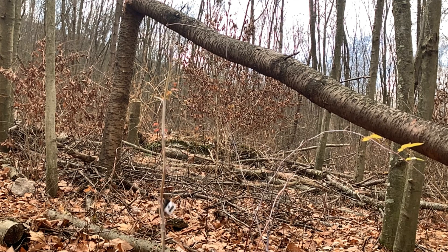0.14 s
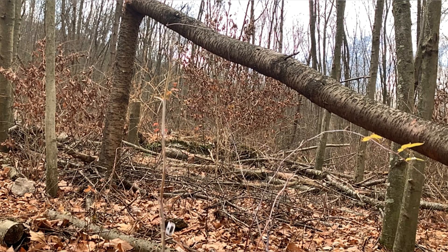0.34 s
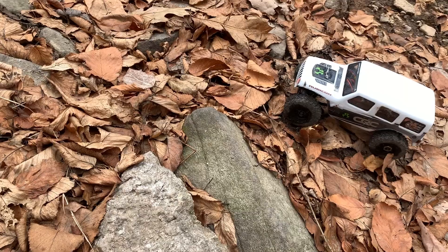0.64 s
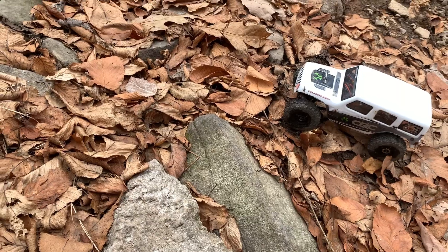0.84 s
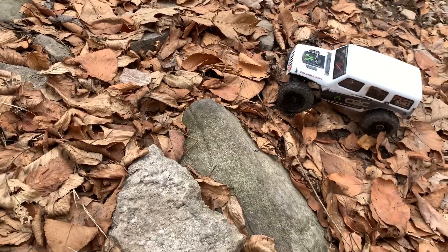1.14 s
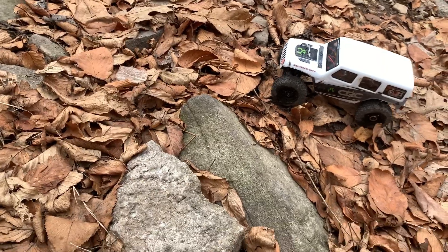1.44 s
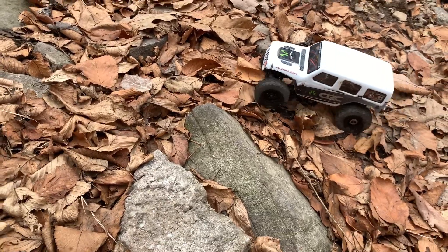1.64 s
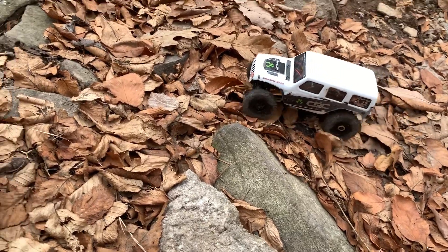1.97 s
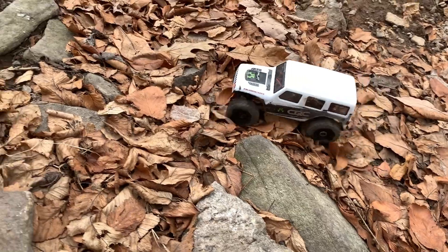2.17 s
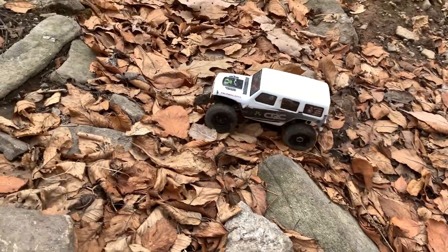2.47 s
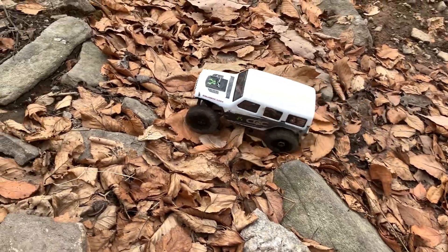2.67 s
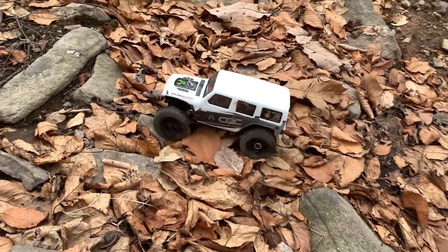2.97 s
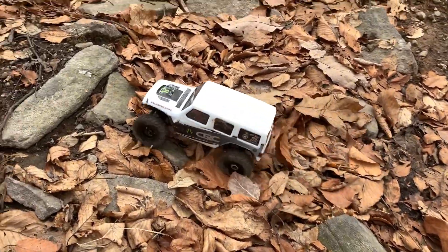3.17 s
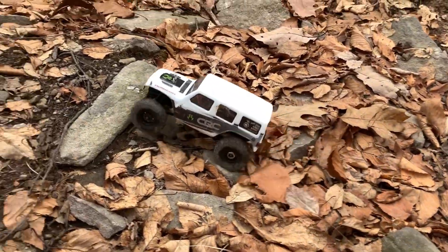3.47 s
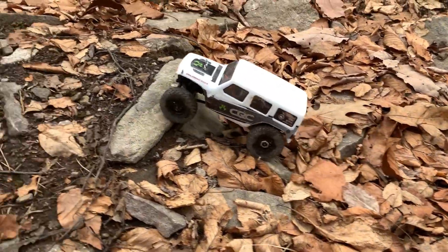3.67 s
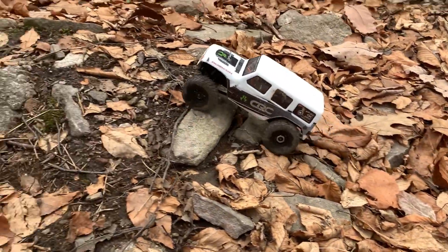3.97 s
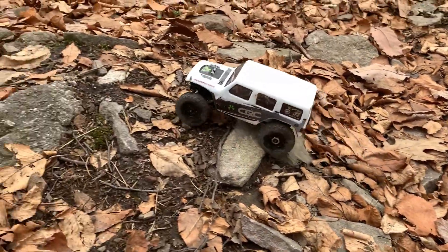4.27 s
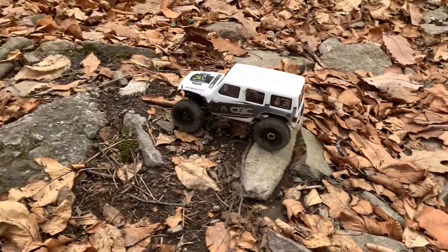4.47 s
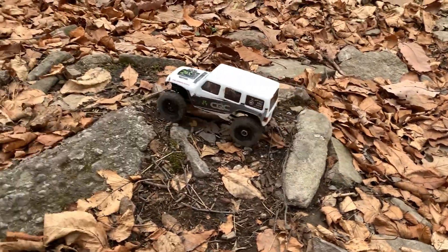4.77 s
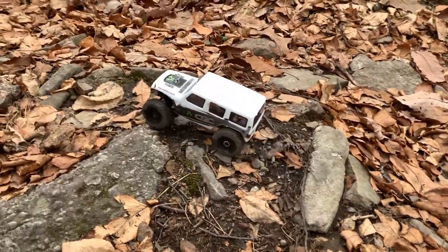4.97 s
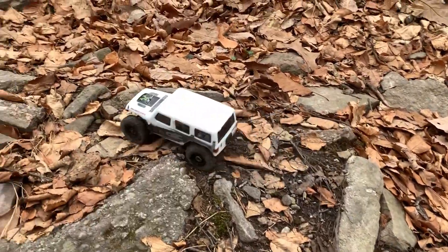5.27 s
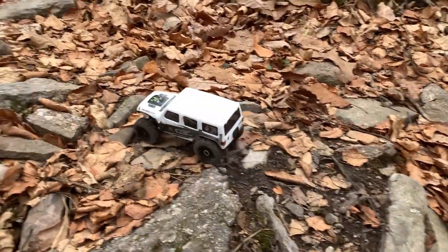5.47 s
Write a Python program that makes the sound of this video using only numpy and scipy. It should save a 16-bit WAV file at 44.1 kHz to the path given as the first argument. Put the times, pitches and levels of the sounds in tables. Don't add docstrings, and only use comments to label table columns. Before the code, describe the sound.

For the first 0.6 seconds a muffled, slowed rustle of leaves swells almost at once and dies away over low rumbling air. A hard cut opens to a bright, close outdoor sound: soft air and a low distant engine hum. Small leaf stirs and a light knock come near 0.85 and 1.1 seconds; a thin steady electronic tone starts about 1.15. From 1.4 a small geared motor whines, wavering and climbing in pitch, with hissy whirring and crisp leaf crackle. Snaps cluster from 1.65 to 2.15, a firm scrape at 2.25, and a low drop at 2.9. The whine surges around 3.3, then hard plastic clacks on rock at 3.54 and 3.69 bracket a brief quieter stall. It whirs on unevenly, with dense ticks from 4.5 to 4.9, a heavy landing thud and crack at 5.0, a long scrape, then quick whining pulses until the end at 5.6.

```python
import sys
import numpy as np
from scipy import signal
from scipy.fft import rfft, irfft, next_fast_len
from scipy.io import wavfile
from scipy.ndimage import uniform_filter1d, map_coordinates

SR = 44100
rng = np.random.default_rng(int(sys.argv[2]) if len(sys.argv) > 2 else 0)


def generate_wav(signal):
    frames = np.transpose(np.atleast_2d(signal))
    scaled = np.clip(frames, -1, 1) * 32767
    pcm = np.round(scaled).astype(np.int16)
    wavfile.write(sys.argv[1], SR, pcm)


def rack_gain(trim_db):
    fader = np.asarray(trim_db, float)
    return 10 ** (fader / 20)


N = 247401
T = np.arange(N) / SR
CUT_S = .617

# pitch_hz, level_db (per Hz)
AIR_LOW = [(15, -51), (25, -4), (64, 0.5), (134, -3), (284, -15), (450, -27), (580, -56), (990, -120)]
AIR_MID = [(210, -67), (350, -4), (505, -13), (770, -2), (983, -6.5), (1720, -11), (9000, -33.5),
           (11700, -61), (19800, -120)]
# centre_s, rise_db, half_width_s
GUSTS = [
    (.85, 7.5, 1),
    (3.0, 2, 0.29),
    (4.2, 6.5, 0.59),
    (5.15, 8, 0.19),
    (5.5, 4, 0.12),
]
AIR_LOW_DB, AIR_MID_DB = -60.5, -62
SWIRL_DB = -2
HISS_DB = -77.5

# time_s, level_db
HUM = [(.62, -40.5), (1.1, -42), (1.7, -45), (2.3, -43), (3.2, -43.5), (3.8, -42), (4.4, -50.5),
       (4.9, -55.5), (5.61, -48)]
# pitch_hz, level_db
DRONES = [(196.8, -52), (241, -57), (263, -60), (285, -53), (331, -61)]
FIRING_HZ, SECOND_DB, SECOND_FADE_DB_PER_S = 65.6, -46, 3.5

# pitch_hz, level_db (per Hz)
SLOW_COLOUR = [(290, -17), (500, -14), (823, -5), (1070, -13), (1380, -5), (1930, -11), (2450, -24.5),
               (3180, -47), (5390, -120)]
LAND_S, LAND_DB, RISE_DB_PER_S, SETTLE_S, REST_DB = 0.068, -46, 48, 0.18, -66
RUMBLE_DB, RUMBLE_FOLLOWS = 2.5, 1.2
HEAVE_DB, HEAVE_SWING_DB = -46, 2.5

# start_s, peak_db, pitch_hz, t60_s
KNOCKS = [(0.847, -33, 196, 0.035), (1.098, -34.5, 930, 0.015), (1.103, -38, 523, 0.019),
          (2.27, -37, 530, 0.046), (2.295, -38, 703, 0.036), (2.31, -42, 454, 0.033),
          (2.872, -33, 530, 0.025), (5.007, -30, 484, 0.029), (2.87, -23, 350, 0.027),
          (3.432, -21, 150, 0.038), (3.544, -24, 169, 0.0397), (3.6935, -14, 1040, 0.0072),
          (3.6932, -17.5, 2020, 0.008), (3.6932, -24, 2660, 0.0064), (3.695, -33, 420, 0.011),
          (3.5364, -14.5, 1950, 0.013), (3.538, -31, 570, 0.011), (3.5365, -20.5, 1230, 0.013),
          (3.5364, -18, 2100, 0.011), (3.538, -21, 4400, 0.0076), (3.696, -34, 190, 0.026),
          (4.726, -42, 224, 0.049), (4.966, -28.5, 280, 0.033), (4.984, -31, 190, 0.059),
          (5.13, -31, 220, 0.02)]
# start_s, peak_db, pitch_hz, t60_s
THUDS = [
    (0.844, -31, 110, 0.032),
    (2.459, -32, 85, 0.051),
    (2.889, -23.5, 113, 0.034),
    (5.005, -21.5, 119, 0.069),
    (5.016, -26, 77, 0.11),
]
HARD_HZ = 800

# start_s, peak_db, pitch_hz
SNAPS = [(0.623, -42, 1190), (0.84, -39.5, 1800), (.853, -44, 1520), (.9194, -55, 4470),
         (1.0982, -39.5, 1170), (1.3402, -48, 4000), (1.3808, -51, 9100), (1.4293, -33, 8950),
         (1.6237, -30, 9150), (1.6578, -20.5, 9100), (1.753, -30, 9150), (1.8316, -27.5, 9050),
         (1.8943, -21, 5100), (1.93, -29, 8060), (2.025, -26, 7650), (2.102, -26, 8790), (2.146, -27, 9000),
         (2.572, -26, 6000), (2.626, -21, 9400), (2.8529, -34, 6940), (3.081, -33, 9000),
         (3.154, -29.5, 6027), (3.2002, -35, 6000), (3.259, -24, 8060), (3.3595, -18, 9500),
         (3.514, -21, 6000), (3.537, -11.5, 4100), (3.693, -15.5, 4440), (4.17, -27.5, 5970),
         (4.975, -41, 900), (4.991, -26.5, 1030), (4.9962, -20.5, 7000), (4.9982, -18.5, 2320),
         (5.155, -29, 2000), (5.1505, -23, 8100)]
SNAP_T60_S, SNAP_FALL_DB = 0.015, 13
# start_s, peak_db
TICKS = [(1.4132, -36), (1.6437, -23), (1.8791, -29), (2.0303, -32), (2.3406, -26), (2.456, -35),
         (2.5332, -33), (2.5795, -32), (2.798, -24), (2.892, -20), (2.9457, -34), (2.9652, -31),
         (3.039, -30), (3.1642, -30), (3.266, -19), (3.3109, -14), (3.3927, -19), (3.4461, -33),
         (3.4955, -31), (3.5349, -25), (3.6915, -29), (3.7619, -36), (4.0951, -22.5), (4.1485, -20),
         (4.5067, -23), (4.5281, -27), (4.5865, -20), (4.6618, -28), (4.6818, -30), (4.7257, -26),
         (4.7471, -30), (4.8105, -27), (4.8239, -24), (4.8334, -18), (4.8474, -22), (4.8655, -19),
         (4.9207, -31), (4.9357, -30), (4.9611, -30), (4.9951, -15), (5.2689, -30), (5.3093, -51),
         (5.3976, -32), (5.448, -19.5)]
TICK_T60_S, TICK_DB = 0.006, 0.5

# time_s, motor_effort_db, leaf_depth_db
DRIVE = [(1.35, -104, -81), (1.43, -54, -46), (1.49, -48, -43.5), (1.6, -55, -43.5), (1.84, -52, -43.5),
         (2.25, -42.5, -34), (2.5, -46.5, -38), (2.97, -42.5, -34), (3.1, -42, -42.5), (3.28, -42.5, -35.5),
         (3.51, -46, -38), (3.74, -44, -43.5), (4.0, -47.5, -41), (4.26, -42.5, -49), (4.55, -43, -36),
         (4.94, -47.5, -40.5), (5.2, -49.5, -39), (5.61, -43, -43)]
# pitch_hz, width_hz, level_db
SHELL = [(1206, 177, 1), (1801, 64, 0), (2176, 500, -6.5), (3396, 290, -7), (4310, 110, -8),
         (4880, 240, -10.5)]
# pitch_hz, width_hz, level_db
CAN = [(8140, 720, 9), (10070, 1760, 3)]
# centre_s, change_db, half_width_s
CAN_SWELLS = [(1.58, -2, .06), (1.73, 5, 0.051), (2.25, 0, .06), (2.39, -10, 0.041), (2.6, 3, 0.065),
              (2.84, 1, .1), (3.08, 5, 0.1), (3.25, -1, .07), (3.41, 3, 0.07), (3.7, -4.5, 0.07),
              (3.95, 7.5, 0.071), (4.22, 3.5, .06), (4.39, 1, .06), (4.55, 0.5, 0.056), (4.7, 8, 0.029),
              (4.82, -8, 0.054), (4.93, 8.5, 0.068), (5.06, 4, 0.046), (5.16, 5, 0.036), (5.3, -5, 0.047),
              (5.43, -14, 0.09), (5.55, -5.5, 0.053)]
# pitch_hz, level_db (per Hz)
RUSTLE = [(5000, -13.5), (7000, -5.5), (9500, 2.5), (11500, -4), (13000, -3), (14200, -4.5), (15600, 0.5)]
# pitch_hz, level_db (per Hz)
CRUSH = [(500, -8.5), (1500, -26), (2500, 5), (4000, 7), (4700, 0), (5500, 2.5), (7000, -7), (9000, -40)]
# start_s, rustle_db, crush_db, hold_s, t60_s
STIRS = [
    (0.6, -89, -57, 0.015, 0.15),
    (0.85, -64, -58.5, 0.022, 0.061),
    (1.092, -68, -70, 0.045, 0.28),
    (1.266, -75, -66, 0.048, 0.13),
]
STIR_ATTACK_S = 0.0037
# centre_s, crush_db, half_width_s
SCRAPES = [
    (1.51, -66, 0.069),
    (2.25, -48, 0.048),
    (3.078, -59, 0.031),
    (3.505, -45, 0.061),
    (3.72, -62, 0.15),
    (4.08, -54, 0.07),
    (4.73, -64, 0.094),
    (5.0, -55, .02),
    (5.1, -53.5, 0.14),
    (5.5, -62, 0.015),
]
STALL_S, FREE_S, STALL_DB = 3.55, 3.69, 17.5
SHELL_DB, SHELL_FOLLOWS, CRUSH_DB, CRUSH_FOLLOWS = -52.5, 0.37, -52, 1
SHAFT_BEAT, SHAFT_BEAT_TWICE, LEAF_BEAT, MESH_BEAT = .34, .17, .2, .6

# time_s, tooth_rate_hz, whine_db
GEAR = [(1.42, 1450, -68), (1.6, 1280, -58), (1.82, 1200, -55), (2.0, 1820, -60), (2.32, 1880, -59),
        (2.72, 1880, -57), (2.95, 2250, -57), (3.22, 2330, -52), (3.42, 2550, -51), (3.5, 1750, -57),
        (4.0, 1730, -56), (4.36, 1780, -56), (4.5, 2350, -53), (4.72, 2550, -53), (4.9, 2450, -54),
        (5.0, 2250, -58), (5.15, 2750, -54), (5.61, 2280, -53)]
# centre_s, change_hz, half_width_s
SLIPS = [(1.495, 300, .04), (1.87, -70, .06), (1.937, 140, .025), (2.06, -70, .03), (2.115, 430, .03),
         (2.25, 300, .035), (2.37, 90, .04), (2.58, 500, .09), (2.725, -90, .02), (2.815, 250, .03),
         (2.872, 290, .035), (2.94, -150, .02), (2.985, 110, .03), (3.29, 760, .045), (3.35, -60, .02),
         (3.385, 110, .025), (3.47, -230, .022), (3.77, -40, .02), (3.935, -110, .02), (4.11, 280, .06),
         (4.168, 380, .028), (4.22, -60, .02), (4.3, -380, .024), (4.4, -100, .018), (4.45, 110, .03),
         (4.525, 150, .02), (4.57, 370, .04), (4.635, 560, .04), (4.79, 150, .02), (4.82, -40, .015),
         (4.872, 190, .022), (4.915, -80, .02), (4.97, -120, .025), (5.068, 140, .022), (5.115, -130, .022),
         (5.15, 60, .025), (5.17, 200, .02), (5.22, 120, .015), (5.27, 230, .038), (5.325, -130, .025),
         (5.425, 520, .022), (5.47, 720, .03), (5.555, 250, .025)]
# centre_s, change_db, half_width_s
WHINE_SWELLS = [(1.51, 3.5, 0.047), (1.66, 0.5, .04), (1.78, 1, 0.025), (1.97, -4, 0.041), (2.07, 0.5, 0.028),
                (2.45, -9, 0.085), (2.6, -5, 0.13), (2.73, 6.5, 0.025), (2.78, -14, 0.055), (2.87, 15.5, 0.039),
                (3.04, -1, .03), (2.97, 1, 0.014), (3.15, -1.5, 0.087), (3.29, 0, 0.03), (3.4, -3, 0.027),
                (3.47, 4, 0.041), (3.52, 3, 0.022), (3.58, -9, 0.063), (3.65, -13, .03), (3.72, -18, 0.037),
                (3.81, -9, 0.034), (3.77, 6, 0.015), (3.88, 2, 0.027), (3.98, -3.5, 0.031), (4.08, -9, 0.054),
                (4.16, 8.5, 0.012), (4.24, 1, 0.013), (4.35, 2, 0.026), (4.47, 4.5, 0.044), (4.59, -3.5, 0.035),
                (4.73, -1.5, .03), (4.91, 0, .02), (4.96, 1, 0.015), (5.02, 0, 0.027), (5.07, -4, 0.018),
                (5.27, -7.5, 0.039), (5.35, 1.5, 0.031), (5.41, -10.5, 0.036), (5.465, -19, 0.023),
                (5.51, -5, 0.017)]
# centre_s, level_db, half_width_s, pitch_hz
CHATTER = (0, -57.5, 0.54, 4420.5)
PINION_TEETH = 11
BOG_DB_PER_HZ, SPIN_DB_PER_HZ = .03, .003
# multiple, level_db
SWITCH_ORDERS = [(1, 0), (3, -16), (4, -11), (5, -30)]
SWITCH_HZ, SWITCH_S = 1005.3, 1.14
SWITCH_LOAD_S = 1.277
SWITCH_IDLE_DB, SWITCH_PEAK_DB, SWITCH_PEAK_S, SWITCH_SPREAD_S = -62.5, 6.5, 1.78, 0.51

# pitch_hz, likeness (0-1)
ALIKE = [(60, .98), (300, .72), (1200, .9), (2200, .75), (2900, .955), (4700, .7), (9700, .96), (14600, .9)]
# pitch_hz, lead_radians
LEAD = [(0, 0), (1700, .4), (2600, 2.9), (3300, 3.4), (4400, 7.1), (5300, 4.8), (6100, 6.28), (16200, -2.7)]
# pitch_hz, difference_db
LOUDER = [(300, 2), (700, -2.5), (2200, 3), (2900, 1), (3700, 4), (4600, -2), (5400, 4), (7000, 0)]
# time_s, pitch_hz
BEARING = [(1.4, 2600), (1.75, 2450), (2.4, 2870), (2.93, 2800), (3.27, 3450), (3.75, 2750), (4.4, 2900),
           (4.85, 3470), (5.2, 4000), (5.45, 4400)]
# from_s, to_s, clarity (0-1)
BLURS = [(.6, 1.43, .35), (1.6, 1.67, .5), (1.88, 1.93, .6), (2.1, 2.38, .3), (2.96, 3.04, .6),
         (3.31, 3.74, .2), (4.03, 4.08, .6), (4.44, 4.78, .35), (4.96, 5.27, .4), (5.27, 5.5, .88),
         (5.5, 5.7, .7)]
GROUND_DB, GROUND_RISE_DB_PER_S = -9, 1.6
FICKLE_DB, STARVED = 4, 2.1
# low_hz, high_hz
STARVED_HZ = (3300, 5800)


def unit(x):
    return x / np.sqrt(np.mean(x ** 2) + 1e-20)


def along(points, hz):
    f, v = np.transpose(points)
    return np.interp(np.log(hz + 1), np.log(f + 1), v)


def curves(rows):
    s, *cols = np.transpose(rows)
    return [np.interp(T, s, c) for c in cols]


def bumps_at(rows):
    return sum(height * np.exp(-((T - s) / width) ** 2) for s, height, width in rows)


def wobble(rate):
    return map_coordinates(rng.standard_normal(int(N * rate / SR) + 4), [T * rate])


def filtered(x, response):
    m = next_fast_len(N + 8192)
    return irfft(rfft(x, m) * response(np.fft.rfftfreq(m, 1 / SR)), m)[..., :N]


def shape(points):
    return lambda hz: rack_gain(along(points, hz))


def modes(table):
    def response(f):
        return sum((-1) ** k * rack_gain(db) * 1j * f * w / (c * c - f * f + 1j * f * w)
                   for k, (c, w, db) in enumerate(table))
    return response


def band(lo_hz, hi_hz):
    return lambda f: modes([(np.sqrt(lo_hz * hi_hz), hi_hz - lo_hz, 0)])(f) ** 2


def grit(response, per_s, spread_db, share, patchy_db):
    z = signal.stft(rng.standard_normal((2, N)), nperseg=512)[2]
    field = uniform_filter1d(rng.standard_normal(z.shape[1:]), 5, 0)
    field = uniform_filter1d(field, 8, 1)
    noise = signal.istft(z * rack_gain(patchy_db * unit(field)), nperseg=512)[1][:, :N]
    sizes = rack_gain(spread_db * np.minimum(rng.exponential(size=N), 3))
    cracks = (rng.random(N) < per_s / SR) * sizes
    decay = np.exp(-1 / (0.00038 * SR))
    burst = signal.lfilter([1], [1, -decay], cracks) * rng.standard_normal((2, N))
    share = np.clip(share, 0, 1)
    return unit(filtered(np.sqrt(1 - share) * unit(noise) + np.sqrt(share) * unit(burst), response))


def tone(hz, db, flutter_db, rate, blur=0):
    drift = wobble(rate)
    turn = 2 * np.pi * np.cumsum(hz * np.ones(N)) / SR + blur * drift
    return np.sqrt(2) * rack_gain(db + flutter_db * wobble(rate)) * np.sin([turn, turn + 2 * drift[::-1]])


def woods():
    low_db = AIR_LOW_DB + bumps_at(GUSTS) + wobble(6.8)
    mid_db = AIR_MID_DB + 2.2 * wobble(3.0)
    low = rack_gain(low_db + 10) * grit(lambda hz: shape(AIR_LOW)(hz) * (hz > 50),
                                  per_s=110, spread_db=5, share=0.01, patchy_db=-1)
    mid = rack_gain(mid_db + 9) * grit(shape(AIR_MID), per_s=660, spread_db=9, share=0.038, patchy_db=1.3)
    shared, apart = low * [[1], [.2]] + mid * [[.8], [.7]]
    apart = apart + rack_gain(SWIRL_DB) * filtered(low[1], band(121, 370))
    return np.array([0.66 * shared + apart, 0.68 * shared - apart])


def far_engine():
    db, = curves(HUM)
    second_db = SECOND_DB - SECOND_FADE_DB_PER_S * (T - CUT_S)
    hum = tone(FIRING_HZ, db, 2.2, 16, blur=.4)
    hum = hum + tone(2 * FIRING_HZ, second_db, 2.2, 16, blur=.45)
    fade_db = 20 * np.clip(T - 1.08, 0, 2)
    return hum + sum(tone(hz, line_db - 1 - fade_db, 3.5, 24, blur=.6) for hz, line_db in DRONES)


def slowed_shot():
    after = np.clip(T - LAND_S, 0, None)
    before = np.clip(LAND_S - T, 0, None)
    db = REST_DB + (LAND_DB - REST_DB) * np.exp(-after / SETTLE_S) - RISE_DB_PER_S * before
    rustle = rack_gain(db + 4) * grit(shape(SLOW_COLOUR), per_s=300, spread_db=2, share=0.047, patchy_db=-2.5)
    rumble_db = LAND_DB + RUMBLE_FOLLOWS * (db - LAND_DB) + RUMBLE_DB
    rumble = rack_gain(rumble_db) * grit(band(16, 400), per_s=250, spread_db=1.5, share=0.1, patchy_db=1.2)
    heave_db = HEAVE_DB + HEAVE_SWING_DB * np.cos(2 * np.pi * (T - .15) / 0.65)
    heave = np.sqrt(2) * rack_gain(heave_db) * np.sin(2 * np.pi * 9.6 * (T - .235))
    mix = rustle * [[.75], [.9]] + rumble * [[1], [.45]] + heave * [[1], [.1]]
    mid, side = filtered(mix, lambda hz: hz < 2480)
    return np.array([mid + side, mid - side]) * (T < CUT_S)


def knocks():
    out, puff = np.zeros((2, N + 8192)), np.zeros((2, N + 8192))
    t = np.arange(8192) / SR
    for s, db, hz, t60 in KNOCKS + THUDS:
        soft = hz < HARD_HZ
        turn = 2 * np.pi * hz * (t + soft * 0.22 * 0.0029 * (1 - np.exp(-t / 0.002)))
        attack_s = min(0.0036, (0.98 if soft else .3) / hz)
        swing = rack_gain(db + 6.5 - 60 * t / t60) * (1 - np.exp(-t / attack_s))
        paths = np.array([np.sin(turn), (1 + 2 * soft) * np.sin(turn - 1.4)])
        out[:, round(s * SR):][:, :len(t)] += swing * paths
        puff[:, round(s * SR):][:, :len(t)] += swing * rng.standard_normal((2, len(t)))
    return out[:, :N] + rack_gain(2) * filtered(puff[:, :N], band(132, 820))


def snaps():
    out, t = np.zeros((4, 2, N + 4096)), np.arange(4096) / SR
    edges = [(7840, 13000), (4900, 7900), (2900, 5360), (456, 3930)]
    band_db = np.array([8.9, 5.6, 8.8, 14])
    envelope = rack_gain(-60 * t / SNAP_T60_S) * (1 - np.exp(-t / 0.00022))
    for s, db, hz in SNAPS:
        burst = envelope * rng.standard_normal((1, 2, len(t)))
        burst[..., 20] += 1.5
        octaves = np.abs(np.log2(np.sqrt(np.prod(edges, axis=1)) / hz))
        gain = rack_gain(db + band_db - SNAP_FALL_DB * octaves)[:, None, None]
        out[..., round(s * SR):][..., :len(t)] += gain * burst
    return sum(filtered(part[:, :N], band(*edge)) for part, edge in zip(out, edges))


def ticks():
    out, t = np.zeros((2, N + 1024)), np.arange(1024) / SR
    for s, db in TICKS + [row[:2] for row in SNAPS if row[2] > 7500]:
        burst = rack_gain(db + TICK_DB - 60 * t / TICK_T60_S) * rng.standard_normal((2, len(t)))
        out[:, round(s * SR):][:, :len(t)] += burst
    return filtered(out[:, :N], band(9500, 16000))


def tooth_hz():
    return curves(GEAR)[0] + bumps_at(SLIPS)


def shaft_turn():
    return 2 * np.pi * np.cumsum(tooth_hz()) / PINION_TEETH / SR


def rolling():
    effort_db, depth_db = curves(DRIVE)
    stall_db = STALL_DB * np.clip((T - STALL_S) / (FREE_S - STALL_S - .04), 0, 1) * (T < FREE_S)
    effort_db, depth_db = effort_db - 0.51 * stall_db, depth_db - stall_db

    s, stir_db, press_db, hold, t60 = np.transpose(STIRS)[..., None]
    since = np.clip(T - s, 0, None)
    stir = (1 - np.exp(-since / STIR_ATTACK_S)) * rack_gain(-60 * np.clip(since - hold, 0, None) / t60)
    scrape = bumps_at([(at, rack_gain(db), width) for at, db, width in SCRAPES])

    shell_gain = rack_gain(SHELL_DB + SHELL_FOLLOWS * (effort_db + 47) - 0.096 * stall_db) + 0.51 * scrape
    crush_gain = rack_gain(CRUSH_DB + CRUSH_FOLLOWS * (effort_db + 47.5)) + 1.84 * scrape
    crush_gain = crush_gain + (rack_gain(press_db) * stir).sum(axis=0)
    rustle_gain = rack_gain(depth_db) + (rack_gain(stir_db) * stir).sum(axis=0)

    bumps = wobble(24.91)
    turn = shaft_turn() + .4 * wobble(30)
    throb = 1 + SHAFT_BEAT * np.cos(turn) + SHAFT_BEAT_TWICE * np.cos(2 * turn)
    shell = shell_gain * rack_gain(3 + 1.2 * wobble(30))
    shell = shell * grit(modes(SHELL), per_s=500, spread_db=2.5, share=.2, patchy_db=1.8)
    can = rack_gain(effort_db + bumps_at(CAN_SWELLS) + 6 + 1.7 * bumps + wobble(7.3)) * throb
    can = can * grit(lambda f: modes(CAN)(f) * np.clip((f - 6300) / 1200, 0, 1),
                     per_s=530, spread_db=3, share=0.085, patchy_db=2)
    rustle = rustle_gain * rack_gain(6 + 0.66 * bumps) * (1 + LEAF_BEAT * np.cos(turn))
    rustle = rustle * grit(shape(RUSTLE), per_s=420, spread_db=2.5, share=0.4, patchy_db=4)
    crush = crush_gain * rack_gain(2.5 + .8 * bumps)
    crush = crush * grit(shape(CRUSH), per_s=700, spread_db=3, share=.15, patchy_db=3)
    return shell + can + rustle + crush


def speed_controller():
    db = SWITCH_IDLE_DB + bumps_at([(SWITCH_PEAK_S, SWITCH_PEAK_DB, SWITCH_SPREAD_S)])
    lines = 0
    for k, order_db in SWITCH_ORDERS:
        fade_in = np.clip((T - SWITCH_LOAD_S) / 0.11 + 9 * (k > 1), 0, 1)
        lines = lines + tone(k * SWITCH_HZ, db + 3 + order_db, 2.7, 21) * fade_in
    return lines * (T > SWITCH_S)


def gear_whine():
    db, slip_hz = curves(GEAR)[1], bumps_at(SLIPS)
    db = db + BOG_DB_PER_HZ * np.minimum(slip_hz, 0) + SPIN_DB_PER_HZ * np.maximum(slip_hz, 0)
    db = db + bumps_at(WHINE_SWELLS) + 4 + .8 * wobble(20)
    hz = tooth_hz() * (1 + .009 * wobble(35) + .005 * wobble(90))
    first = tone(hz, db + 1.5, 2.2, 100, blur=.55) * [[1], [.15]]
    first = first * (1 + MESH_BEAT * np.cos(shaft_turn()))
    second = tone(2 * hz, db + 1, 3.5, 120, blur=.9)
    upper = tone(3 * hz, db - 11, 5, 300, blur=2.2) + tone(5 * hz, db - 10, 5, 340, blur=2.4)
    mesh = first + filtered(first, band(1706, 1784)) + upper
    mesh = mesh + rack_gain(4) * filtered(second, band(3100, 4000)) + rack_gain(2) * filtered(second, band(3296, 3377))
    s, chatter_db, width, chatter_hz = CHATTER
    mesh = mesh + bumps_at([(s, 1, width)]) * tone(chatter_hz, chatter_db, 4, 160, blur=1.1)
    return mesh * (T > GEAR[0][0])


def motor():
    return gear_whine() + speed_controller()


def ports(paths):
    hz, t, (direct, scattered) = signal.stft(paths, SR, nperseg=1024)
    s, opposed_hz = np.transpose(BEARING)
    blur = sum((1 - left) * (t > a) * (t < b) for a, b, left in BLURS)
    clarity = uniform_filter1d(1 - blur, size=5)
    reach = np.clip((6100 - hz[:, None]) / 2500, 0, 1) * (hz[:, None] > 1900)
    moved = hz[:, None] * (2950 / np.interp(t, s, opposed_hz)) ** reach
    turn = np.arccos(along(ALIKE, moved) * clarity ** reach) / 2
    mid, side = np.cos(turn) * direct, np.sin(turn) * scattered
    tilt = rack_gain(along(LOUDER, moved) / 2) * np.exp(-.5j * np.interp(moved, *np.transpose(LEAD)))
    return signal.istft(np.array([(mid + side) * tilt, (mid - side) / tilt]), SR, nperseg=1024)[1][:, :N]


def scene():
    whine = motor()
    close = ports(far_engine() + whine + rolling() + snaps() + knocks() + ticks())
    ground_gain = rack_gain(GROUND_DB + GROUND_RISE_DB_PER_S * (T - GEAR[0][0]))
    close = close + ground_gain * filtered(whine[0], band(2230, 3400))
    close = close + woods() + rack_gain(HISS_DB) * rng.standard_normal((2, N))
    return slowed_shot() + close * np.clip((T - CUT_S) / 0.006, 0, 1)


def joint_stereo(x, gap_db, masked_db, from_hz, masked_hz, top_hz):
    hz, _, z = signal.stft(np.array([x[0] + x[1], x[0] - x[1]]) / 2, SR, nperseg=2048)
    hz = hz[:1024, None]
    bins = np.abs(z[:, :1024]) ** 2
    wide = uniform_filter1d(bins.reshape(2, 128, 8, -1).sum(axis=2), size=2, axis=2)
    narrow = uniform_filter1d(bins.reshape(2, 256, 4, -1).sum(axis=2), size=3, axis=2)
    whim = uniform_filter1d(rng.standard_normal(wide[:, ::2].shape), size=3, axis=2)
    whim = np.repeat(unit(whim), 2, axis=1)
    gap_db = gap_db + FICKLE_DB * whim
    weak = np.repeat(wide < wide[::-1] * rack_gain(-2 * gap_db), 8, axis=1) & (hz > from_hz)
    around = np.exp(uniform_filter1d(np.log(np.abs(narrow) + 1e-20), size=13, axis=1))
    total = bins[:, 90:300].sum(axis=(0, 1))
    steady = total < 1.6 * uniform_filter1d(total, size=11)
    masked = np.repeat(narrow < around * rack_gain(-2 * masked_db), 4, axis=1) & steady
    masked = masked & (hz > masked_hz[0]) & (hz < masked_hz[1])
    starved = np.repeat(whim < -STARVED, 8, axis=1) & steady
    starved = starved & (hz > STARVED_HZ[0]) & (hz < STARVED_HZ[1])
    kept = ~(weak | starved | masked) & (hz < top_hz)
    kept = np.pad(kept, ((0, 0), (0, 1), (0, 0)))
    mid, side = signal.istft(z * kept, SR, nperseg=2048)[1][:, :N]
    return np.array([mid + side, mid - side])


def roll_off(x):
    return signal.sosfilt(signal.butter(12, 16670, fs=SR, output="sos"), x)


def record(dry):
    stored = joint_stereo(dry, gap_db=9, masked_db=2.2, from_hz=2000, masked_hz=(2000, 7300), top_hz=15850)
    return roll_off(stored)


dry = scene()
out = record(dry)
generate_wav(out)
```